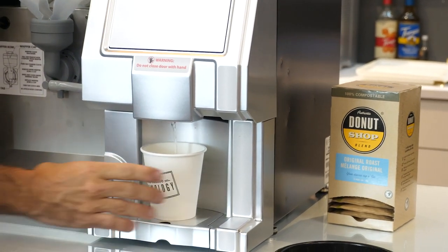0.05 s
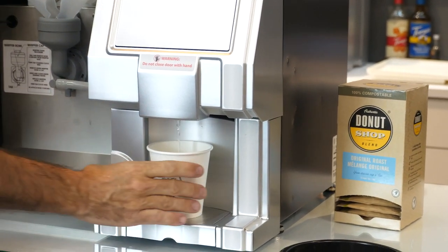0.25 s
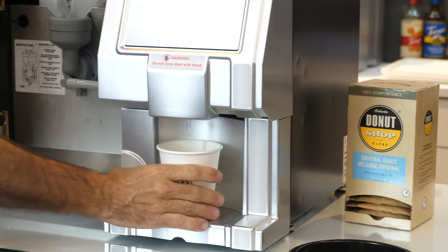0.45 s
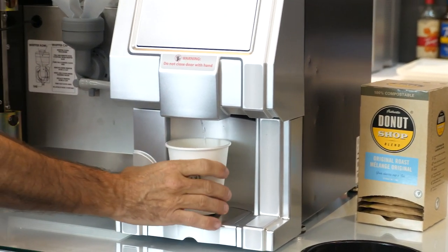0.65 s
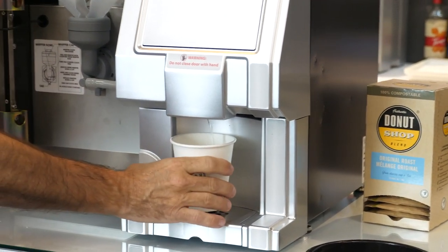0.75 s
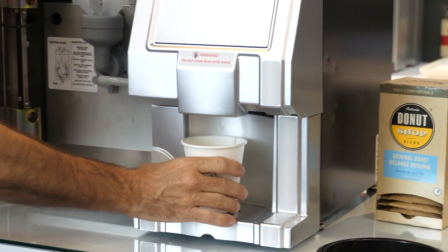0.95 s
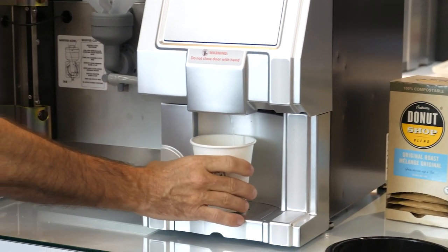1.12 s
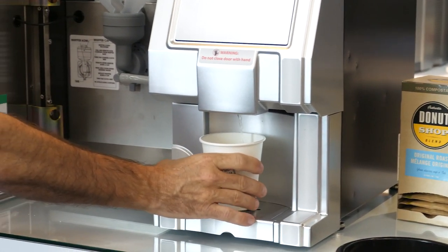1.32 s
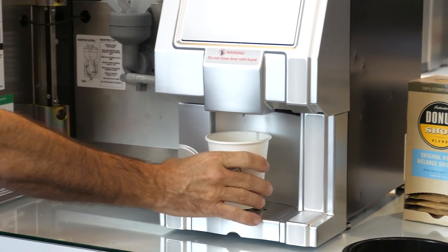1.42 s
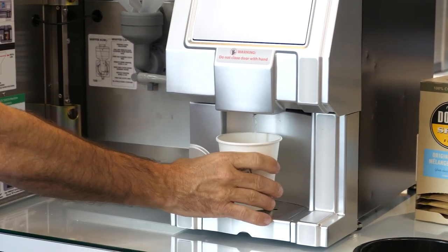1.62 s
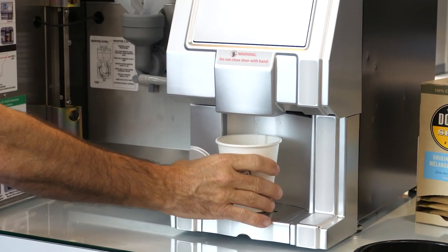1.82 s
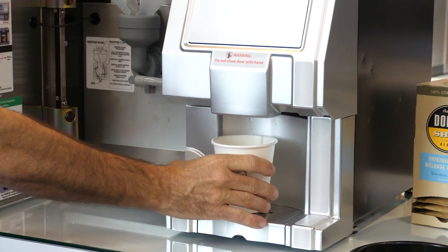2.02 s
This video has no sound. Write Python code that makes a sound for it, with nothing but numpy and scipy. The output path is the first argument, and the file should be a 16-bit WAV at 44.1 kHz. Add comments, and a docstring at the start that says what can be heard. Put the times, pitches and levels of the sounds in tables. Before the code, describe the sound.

Water dribbles in quick drops into a paper cup while a coffee machine hums steadily

```python
"""A machine hums and its fan blows throughout while water dribbles from its spout into a hand-held paper cup.
The hum is a sum of mains partials; fan, room air and hiss are noise shaped in third-octave bands.
Drops are paired decaying sines that knock the cup's short dull modes; the thin stream strikes them at random.
Bubbles plink as rising sines, splashes tick as noise puffs with ringing droplets, sprays fizz, soft bumps thud.
A short noise tail stands for the steel alcove and the quiet room."""
import sys
import numpy as np
from scipy import signal
from scipy.io import wavfile
from scipy.ndimage import uniform_filter1d

SR = 44100
rng = np.random.default_rng(int(sys.argv[2]) if len(sys.argv) > 2 else 0)


def to_linear_factor(level_db):
    """Convert decibel levels (scalar or array-like) to linear amplitude factors."""
    exponent = np.asarray(level_db, float) / 20
    return 10 ** exponent


def int16_out(signal):
    """Quantize to a 16-bit WAV file."""
    q = np.round(np.clip(np.atleast_2d(signal).T, -1, 1) * 32767)
    wavfile.write(sys.argv[1], SR, q.astype(np.int16))


N = 91507

# course of the hum: t/s, level/dB
HUM_LEVEL = [(0.0, -58.5), (0.14, -57.5), (0.64, -54), (1.45, -53.5), (2.07, -54.5)]
# hum partials: multiple of the hum frequency, relative level/dB
HUM_PARTIALS = [(.5, -11.5), (1, 1), (2, -2.5), (3, -2), (4, -13.5), (5, -14.5), (6, -3.5), (8, -13.5),
                (10, -16), (12, -32.5)]
# spectrum of fan and room air: f/Hz, relative density/dB per Hz
AIR_SPECTRUM = [(18, -12), (30, -2.5), (50, -7.5), (85, -4.5), (170, -5.5), (300, -9), (430, -9.5),
                (650, -9.5), (850, -13), (1400, -21), (2700, -33), (3350, -21.5), (4500, -42.5),
                (9000, -96)]
# narrow housing resonances: f/Hz, bandwidth/Hz, rms level/dB before the common swell
HOUSING_RESONANCES = [(28.6, 18, -65), (560, 32, -66), (3336, 230, -73.5), (2250, 30, -80)]
# spectrum of microphone hiss: f/Hz, relative density/dB per Hz
HISS_SPECTRUM = [(1470, -22), (2500, -20.5), (3320, -22), (4310, -10.5), (14500, -12), (15600, -17)]
# modes of the cup: f/Hz, relative level/dB, t60/s
CUP_MODES = [(580, -19, 0.052), (741, -3.5, 0.048), (868, 7, 0.025), (1077, 0, 0.031), (1304, 2.5, 0.032),
             (1450, 1.5, 0.025), (1572, -3.5, 0.038), (1814, -3.5, 0.026), (2020, -2.5, 0.023),
             (2495, -3.5, 0.013), (2940, -13, 0.037)]
# thin stream between the drops: t/s, relative level/dB
STREAM_LEVEL = [(0.0, -59.5), (0.29, -58.5), (0.6, -56.5), (0.92, -64.5), (1.28, -64), (1.46, -76.5),
                (1.57, -59), (1.8, -60), (1.94, -57), (2.07, -62)]
# plinking bubbles: t/s, starting level/dB, starting f/Hz
PLINKS = [(0.0288, -52, 2740), (0.1196, -56, 3040), (0.2988, -52, 2920), (0.6055, -54, 3280),
          (0.7757, -53.5, 3210), (0.966, -51.5, 3050), (1.05, -50.5, 3090), (1.709, -54.5, 2970),
          (1.7689, -59, 3440), (1.9527, -50, 2850)]
# drops: t/s, relative level/dB, main f/Hz, second f/Hz, second against main/dB, t60/s
DROPS = [(0.055, -56, 876, 1370, -12, 0.064), (0.063, -39.5, 1818, 1563, 0.5, 0.028),
         (0.069, -51.5, 1860, 1520, -4, 0.029), (0.141, -49, 750, 1616, -16, 0.097),
         (0.16, -47.5, 730, 1640, -19, 0.058), (0.209, -52.5, 1300, 940, 3, 0.026),
         (0.223, -45, 1070, 1360, -5, 0.04), (0.353, -51, 824, 1047, -4, 0.065),
         (0.375, -53, 852, 1297, -9, 0.057), (0.414, -47.5, 1997, 1410, -11, 0.021),
         (0.434, -52, 1260, 581, -7, 0.04), (0.459, -51, 1330, 1561, -12, 0.024),
         (0.489, -54.5, 1180, 1430, 2, 0.037), (0.529, -51, 1080, 1356, -1, 0.035),
         (0.568, -46, 1083, 1350, -12, 0.044), (0.59, -51, 1040, 1570, -19, 0.049),
         (0.634, -54.5, 1040, 1515, -4.5, 0.087), (0.657, -44, 1060, 797, -11, 0.035),
         (0.685, -52.5, 1550, 575, -2, 0.028), (0.742, -45, 1430, 1034, -1, 0.024),
         (0.778, -55, 800, 2100, -3, 0.028), (0.806, -49, 1035, 690, -1, 0.032),
         (0.861, -51, 1040, 740, -4, 0.035), (0.919, -51, 1066, 774, -9, 0.029),
         (0.954, -56.5, 560, 1470, -1.5, 0.039), (0.967, -56, 1320, 1030, -4, 0.04),
         (1.195, -55, 581, 1100, 0, 0.032), (1.224, -58.5, 870, 1430, 2.5, 0.031),
         (1.39, -41, 1526, 1925, -2.5, 0.014), (1.402, -55, 1580, 1070, 1, 0.029),
         (1.417, -54, 1090, 710, 5, 0.019), (1.457, -42, 1070, 750, 0, 0.027),
         (1.496, -46.5, 1443, 1110, -9, 0.027), (1.544, -49, 1046, 748, -7, 0.035),
         (1.56, -49.5, 787, 1553, -4.5, 0.049), (1.607, -44.5, 732, 1410, -17, 0.061),
         (1.622, -51.5, 750, 1017, -18, 0.11), (1.643, -55, 676, 1104, -1, 0.05),
         (1.672, -44.5, 1010, 1583, -6, 0.029), (1.693, -48.5, 1453, 1787, -4, 0.033),
         (1.722, -54.5, 1060, 1960, -2, 0.027), (1.737, -52, 2010, 590, 2, 0.02),
         (1.761, -45.5, 1114, 1620, -13, 0.025), (1.861, -46, 1120, 1420, 0, 0.026),
         (1.887, -43, 1484, 1070, -9, 0.029), (1.922, -54.5, 1110, 1400, -4, 0.023),
         (1.951, -43.5, 1060, 1550, -3, 0.023), (1.979, -51.5, 1082, 607, -6, 0.035)]
# splash ticks: t/s, relative level/dB, droplet f/Hz, puff against droplet/dB
TICKS = [(0.224, -41.5, 10400, -2), (0.236, -46, 10400, -10), (0.3887, -52, 9390, -5),
         (0.4735, -47, 5600, -9), (0.4997, -47, 4000, -14), (0.5685, -37.5, 5270, -20),
         (0.6345, -53, 8900, -2), (0.7164, -52, 9600, -4), (0.777, -46, 8800, -5), (0.807, -56.5, 5100, -2),
         (0.863, -47.5, 4640, -10), (0.9653, -49, 4040, 2), (1.1744, -54, 10400, -12),
         (1.196, -37, 13500, -15.5), (1.533, -45.5, 6730, -2), (1.6207, -37.5, 4950, -4),
         (1.6935, -55, 5050, 2), (1.721, -43, 8760, -4.5), (1.737, -49.5, 4970, 0),
         (1.8622, -43.5, 4900, -7), (1.921, -52.5, 5100, 1), (1.9314, -55, 4050, 7), (1.95, -45, 4000, -7)]
# sprays of fine droplets: t/s, length/s, level/dB before the envelope, centre f/Hz
SPRAYS = [(0.333, 0.032, -76, 7550), (0.497, 0.021, -63, 4770), (0.568, .02, -66, 5230),
          (0.671, 0.022, -67.5, 6100), (0.861, 0.017, -61, 2760), (1.535, 0.018, -67.5, 7040)]
# soft low bumps: t/s, level/dB before swell and decay, f/Hz, t60/s
BUMPS = [(0.498, -45.5, 283, 0.098), (0.518, -49, 148, 0.16), (.81, -55, 45.3, 0.068),
         (0.968, -45, 63, 0.17)]


def rms_one(x):
    """Normalization: division by the root mean square gives unit rms."""
    return x / np.sqrt(np.mean(x ** 2) + 1e-20)


def in_time(rows):
    """Linear interpolation: a (t/s, value) table is read at every sample."""
    s, value = np.transpose(rows)
    return np.interp(np.arange(N) / SR, s, value)


def add(out, s, sound):
    """Superposition: a sound is added to the mix from time s."""
    start = int(s * SR)
    out[start:start + len(sound)] += sound


def drift(rate_hz):
    """Low-pass filtering: two equal poles turn white noise into a slow fluctuation of unit rms."""
    step = 40  # samples between computed values
    pole = np.exp(-2 * np.pi * rate_hz * step / SR)
    white = rng.standard_normal(N // step + 2002)
    slow = signal.lfilter([1], [1, -2 * pole, pole * pole], white)[2000:]  # settled part
    return np.interp(np.arange(N) / step, np.arange(len(slow)), rms_one(slow))


def ring(clicks, hz, t60):
    """Damped resonance: a unit click excites a two-pole mode, a sine decaying from height 1."""
    pole, turn = to_linear_factor(-60 / (t60 * SR)), 2 * np.pi * hz / SR
    return signal.lfilter([0, np.sin(turn)], [1, -2 * pole * np.cos(turn), pole * pole], clicks + 1e-18)


def banded_noise(spectrum, patchy_db):
    """Spectral shaping: third-octave noise bands, each with its level and flicker, sum to one row of unit rms."""
    hz, db = np.transpose(spectrum)
    edges = 20 * 2 ** np.arange(0, 9.8, 1 / 3)
    white = rng.standard_normal((2, N + 8000))  # neighbouring bands use different noise
    out = 0
    for k, (low, high) in enumerate(zip(edges, edges[1:])):
        band_filter = signal.butter(2, [low, high], "band", fs=SR, output="sos")
        band = signal.sosfilt(band_filter, white[k % 2])[-N:]
        band_db = np.interp(np.log(low * high) / 2, np.log(hz), db)  # at the geometric centre
        out = out + band * to_linear_factor(band_db + patchy_db * drift(31.5))
    return rms_one(out)


def mains_hum():
    """Harmonic synthesis: wavering partials of the mains buzz, whose phase lag grows as the multiple squared."""
    hum_hz, waver_db, lead_rad, spread_rad = 119.98, 0.8, 2.3, -0.2542
    turn = 2 * np.pi * hum_hz * np.arange(N) / SR
    hum = np.zeros(N)
    for k, db in HUM_PARTIALS:
        level = to_linear_factor(db + waver_db * drift(11.0))
        hum += level * np.sin(k * turn + lead_rad + spread_rad * k * k)
    return to_linear_factor(in_time(HUM_LEVEL)) * hum


def fan_air():
    """Broadband flow noise and noise-driven housing resonances swell together, partly following the hum."""
    air_db, patchy_db, follows_hum = -57.5, 2.3, 0.87
    air = to_linear_factor(air_db) * banded_noise(AIR_SPECTRUM, patchy_db)
    for hz, width, db in HOUSING_RESONANCES:
        t60 = np.log(1000) / (np.pi * width)  # a narrower resonance rings longer
        air = air + to_linear_factor(db) * rms_one(ring(rng.standard_normal(N), hz, t60))
    level_db = in_time(HUM_LEVEL)
    return air * to_linear_factor(follows_hum * (level_db - level_db.mean()))


def stream_patter():
    """Random excitation: the stream strikes the cup's modes, more often and more strongly as its level rises."""
    rate_per_s, patter_db = 150, -5  # rate at the mean stream level
    stream_db = in_time(STREAM_LEVEL)
    struck = rng.random(N) < rate_per_s * to_linear_factor(stream_db - stream_db.mean()) / SR
    patter = np.zeros(N)
    for hz, db, t60 in CUP_MODES:
        patter += ring(struck * to_linear_factor(db) * rng.standard_normal(N), hz, t60)
    return to_linear_factor(stream_db + patter_db) * rms_one(patter)


def microphone_hiss():
    """Partial correlation: a common noise plus an opposed noise makes hiss partly own to each side."""
    hiss_db, alike = -70, 0.29  # alike: correlation between the sides
    mid, side = banded_noise(HISS_SPECTRUM, 0.17), banded_noise(HISS_SPECTRUM, 0.24)
    opposed = side * np.array([[1], [-1]])
    return to_linear_factor(hiss_db) * (np.sqrt((1 + alike) / 2) * mid + np.sqrt((1 - alike) / 2) * opposed)


def room(x):
    """Reverberation: convolution with a short decaying noise tail of the steel alcove and the room."""
    t60, room_db = 0.13, -11
    t = np.arange(SR // 3) / SR
    tail = rng.standard_normal(len(t)) * to_linear_factor(-60 * t / t60) * (t > 0.004)  # 4 ms delay
    tail = tail / np.sqrt(np.sum(tail ** 2))
    return to_linear_factor(room_db) * signal.fftconvolve(x, tail)[:N]


def bubble_plinks():
    """Bubble resonance: each small bubble rings as a decaying sine of rising pitch."""
    t60, rise = 0.021, 3.5  # s; phase stretch, share per s
    out, t = np.zeros(N + SR), np.arange(SR // 20) / SR
    for s, db, hz in PLINKS:
        add(out, s, to_linear_factor(db - 60 * t / t60) * np.sin(2 * np.pi * hz * t * (1 + rise * t)))
    return out[:N]


def cup_drops():
    """Modal excitation: each drop swells at two pitches and lightly knocks all cup modes by chance amounts."""
    drop_db, swell_s, knock_db = 4.5, 0.00066, -13
    hz, mode_db, t60 = np.transpose(CUP_MODES)[:, :, None]
    out, t = np.zeros(N + SR), np.arange(SR // 8) / SR
    swell, turn = 1 - np.exp(-t / swell_s), 2 * np.pi * t
    modes = to_linear_factor(knock_db + mode_db - 60 * t / t60) * np.sin(hz * turn)
    for s, db, main, second, second_db, decay in DROPS:
        strength = rng.standard_normal((len(CUP_MODES), 1))
        pair = np.sin(main * turn) + to_linear_factor(second_db) * np.sin(second * turn)
        pair = pair * to_linear_factor(-60 * (t / decay) ** 1.022)
        knock = np.sum(modes * strength, axis=0)
        add(out, s, to_linear_factor(db + drop_db) * swell * (pair + knock))
    return out[:N]


def splash_ticks():
    """Impulsive radiation: a dying bright puff and a ragged ringing droplet, then the puff again as a weaker crackle."""
    tick_db, puff_t60, ring_cycles, ragged = -4, 0.011, 40.6, 0.3  # droplet falls 60 dB in ring_cycles
    crackle_s, crackle_db = 0.0033, -8.5
    out, t = np.zeros(N + SR), np.arange(SR // 20) / SR
    bright = signal.butter(1, [3000, 11900], "band", fs=SR, output="sos")
    for s, db, hz, puff_db in TICKS:
        puff = signal.sosfilt(bright, rng.standard_normal(len(t))) * to_linear_factor(puff_db - 60 * t / puff_t60)
        rag = 1 + ragged * rms_one(uniform_filter1d(rng.standard_normal(len(t)), size=24))
        onset = np.minimum(t * hz / 2.5, 1)  # 2.5 cycles
        droplet = rag * onset * np.sin(2 * np.pi * hz * t) * to_linear_factor(-60 * t * hz / ring_cycles)
        add(out, s, to_linear_factor(db + tick_db) * (puff + droplet))
        delay = crackle_s * rng.uniform(0.69, 1.5)
        add(out, s + delay, to_linear_factor(db + tick_db + crackle_db) * puff)
    return out[:N]


def sprays():
    """Band-limited impulsive noise: cubed noise fizzes under a half-sine envelope."""
    out, t = np.zeros(N + SR), np.arange(SR // 20) / SR
    for s, length, db, hz in SPRAYS:
        band = signal.butter(1, [hz / 1.46, hz * 1.05], "band", fs=SR, output="sos")
        fizz = signal.sosfilt(band, rng.standard_normal(len(t)) ** 3)  # the cube favours peaks
        envelope = np.sin(np.pi * np.minimum(t / length, 1))
        add(out, s, to_linear_factor(db) * rms_one(fizz) * envelope)
    return out[:N]


def bumps():
    """Damped oscillation: soft low thuds, each with one cycle of swell and an exponential decay."""
    out, t = np.zeros(N + SR), np.arange(SR // 3) / SR
    for s, db, hz, t60 in BUMPS:
        swell = np.minimum(t * hz, 1)
        add(out, s, to_linear_factor(db - 60 * t / t60) * swell * np.sin(2 * np.pi * hz * t))
    return out[:N]


def scene():
    """Superposition: all sources reach both sides alike; the room returns less of the bright splashes."""
    machine = mains_hum() + fan_air()
    cup = stream_patter() + cup_drops()
    splashes = bubble_plinks() + splash_ticks() + sprays()
    water = cup + splashes + room(cup + 0.74 * splashes)
    return np.tile(water + machine + bumps(), (2, 1))


def low_pass(x):
    """Removes everything above the highest recorded frequency."""
    return signal.sosfilt(signal.butter(12, 15790, fs=SR, output="sos"), x)


def record(dry):
    """Additive noise: microphone hiss joins the scene to make the finished mix."""
    mix = dry + microphone_hiss()
    return low_pass(mix)


dry = scene()
out = record(dry)
int16_out(out)
```